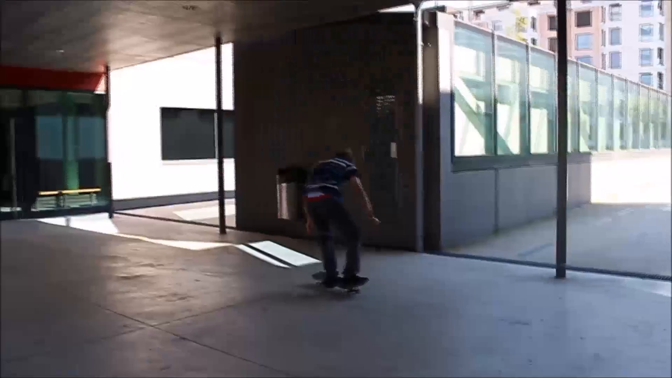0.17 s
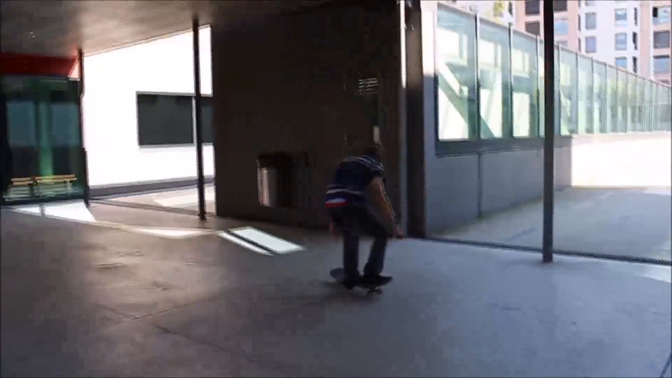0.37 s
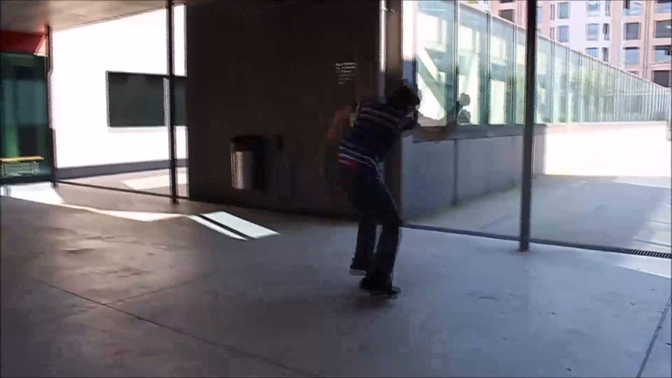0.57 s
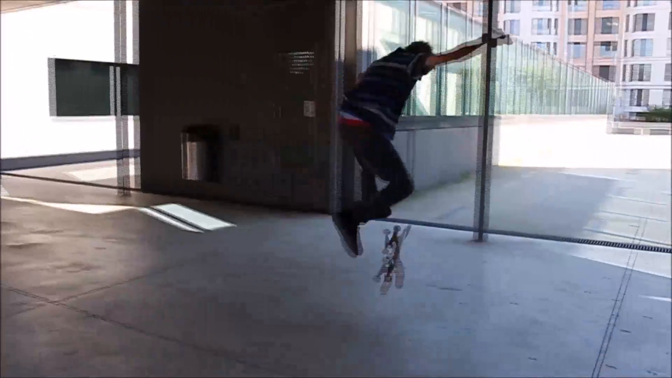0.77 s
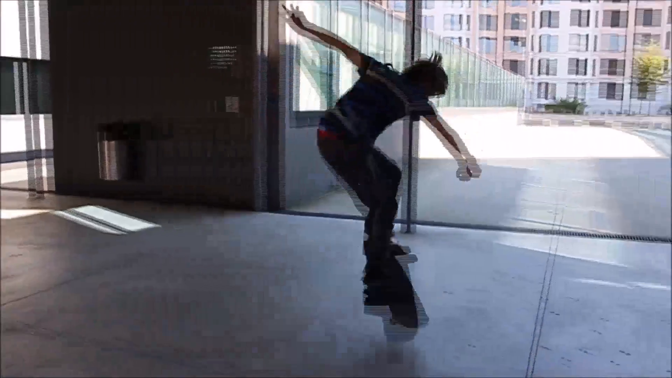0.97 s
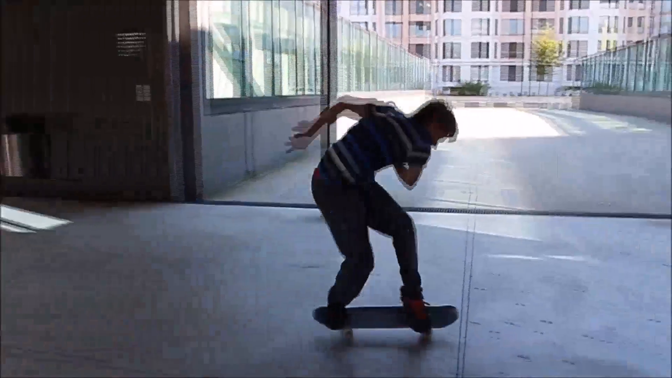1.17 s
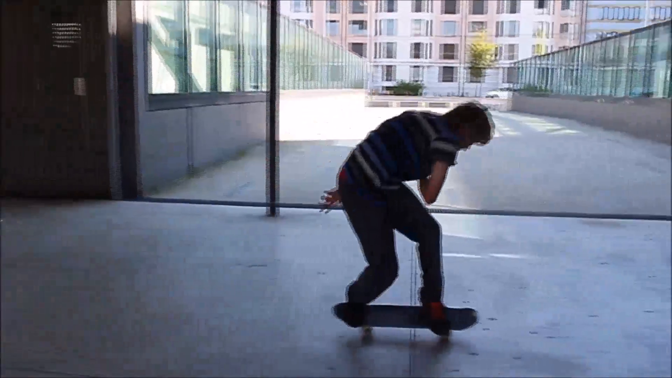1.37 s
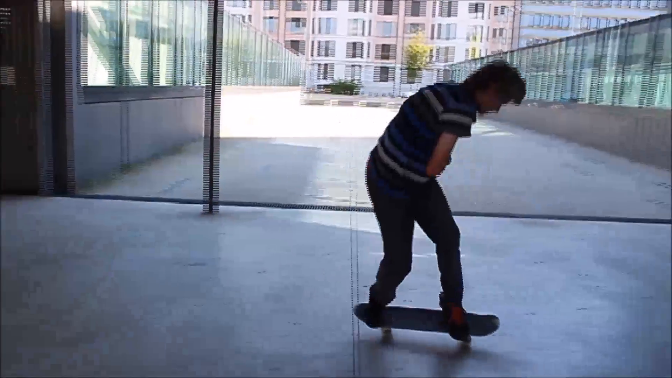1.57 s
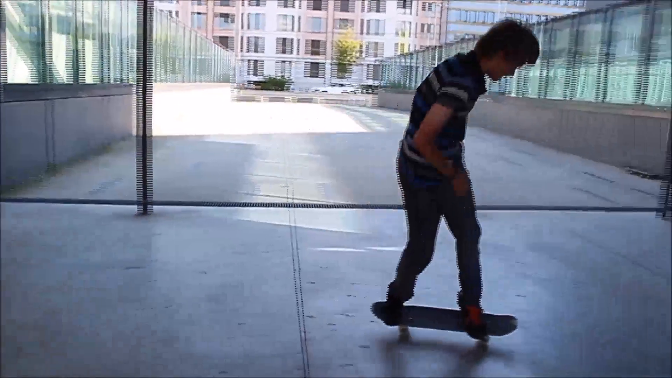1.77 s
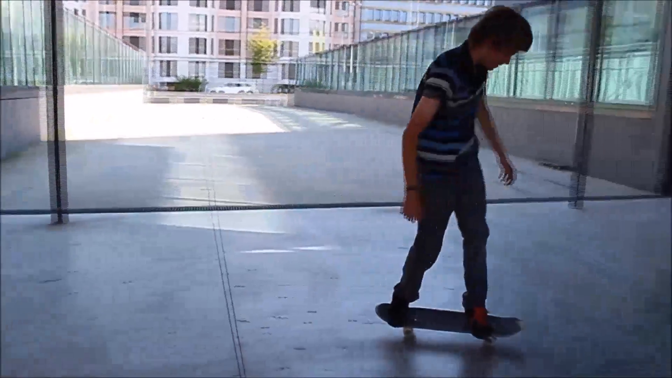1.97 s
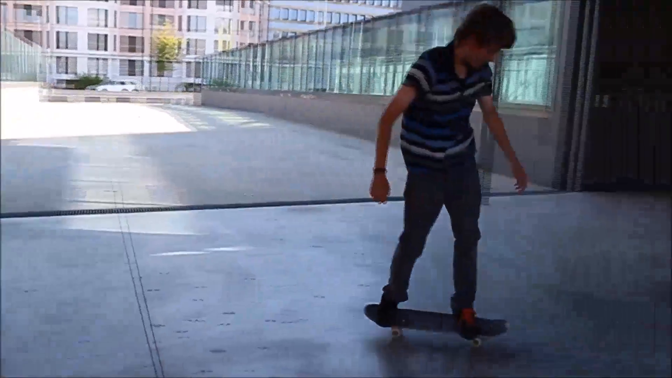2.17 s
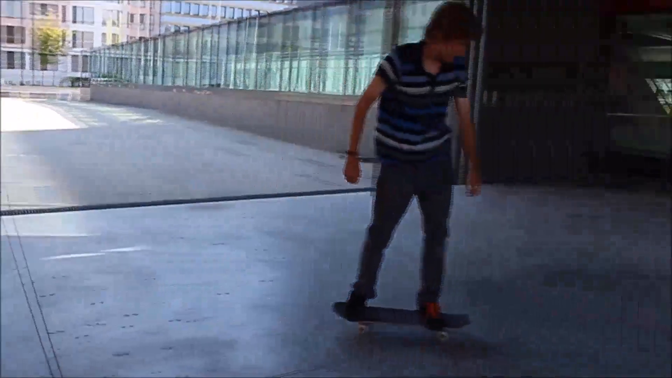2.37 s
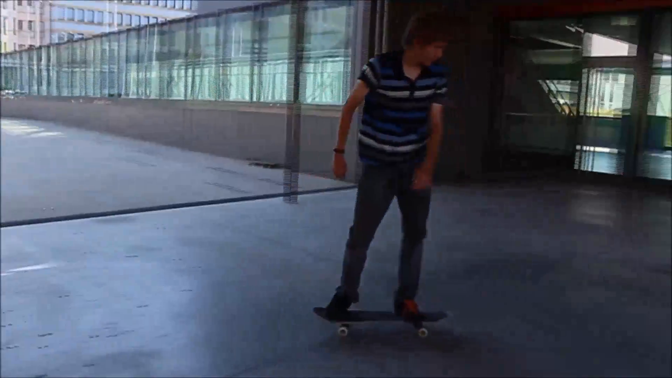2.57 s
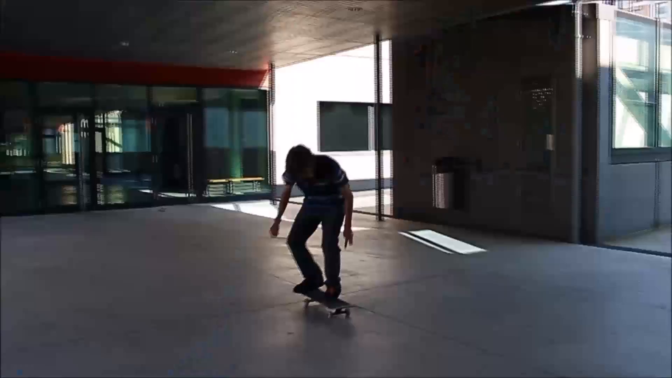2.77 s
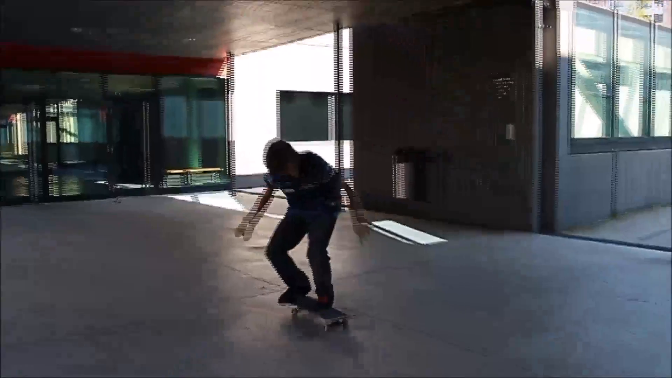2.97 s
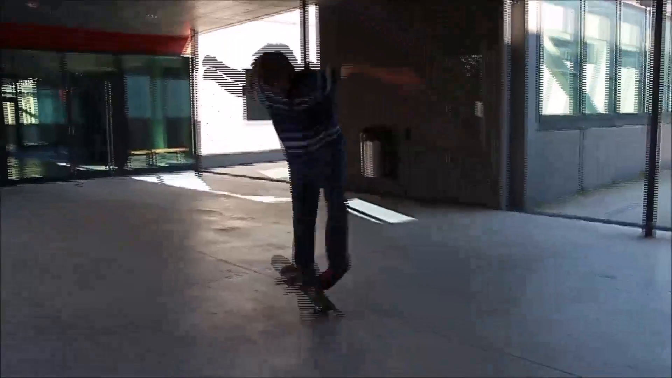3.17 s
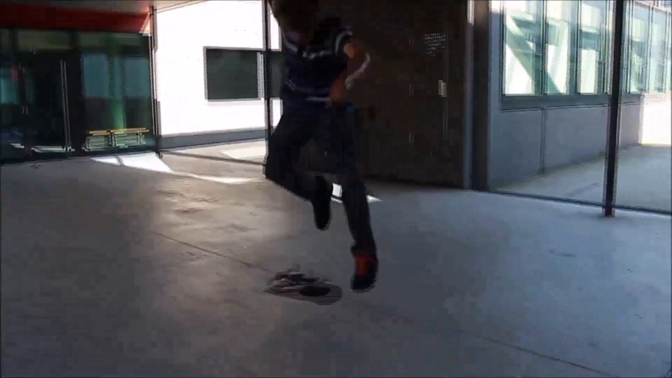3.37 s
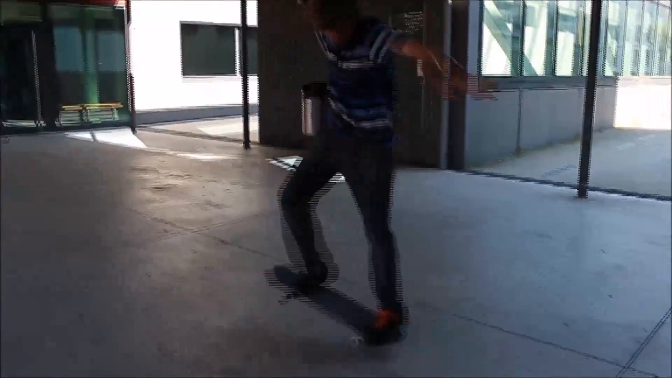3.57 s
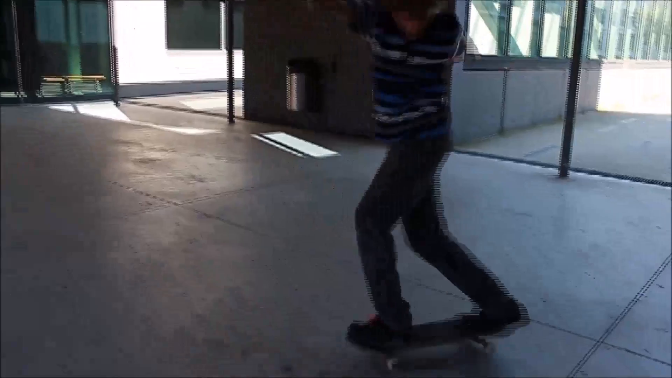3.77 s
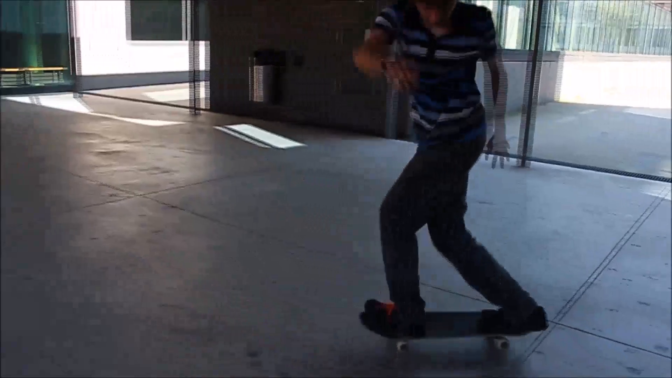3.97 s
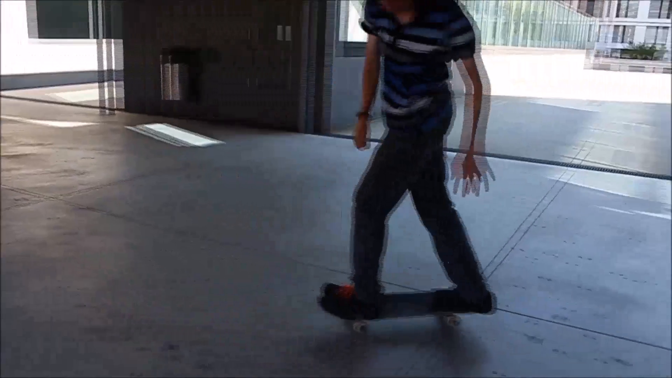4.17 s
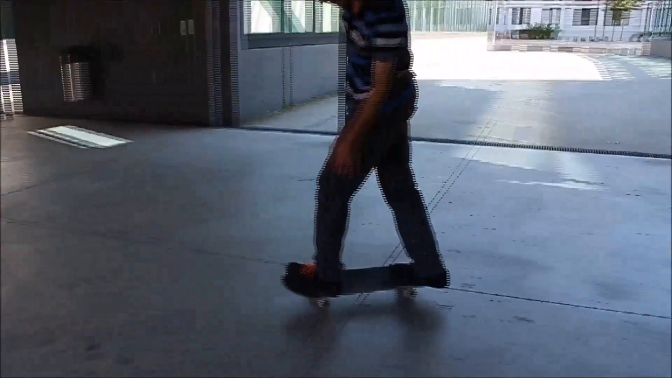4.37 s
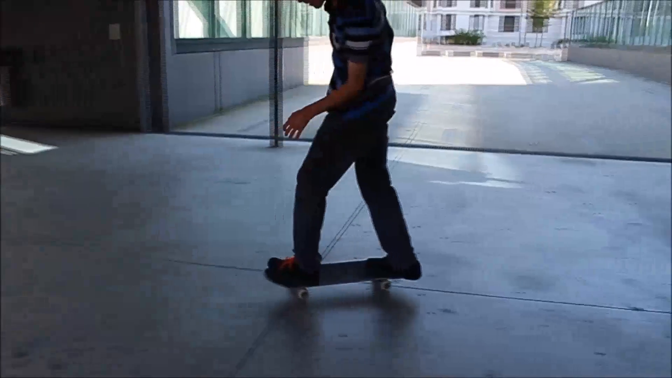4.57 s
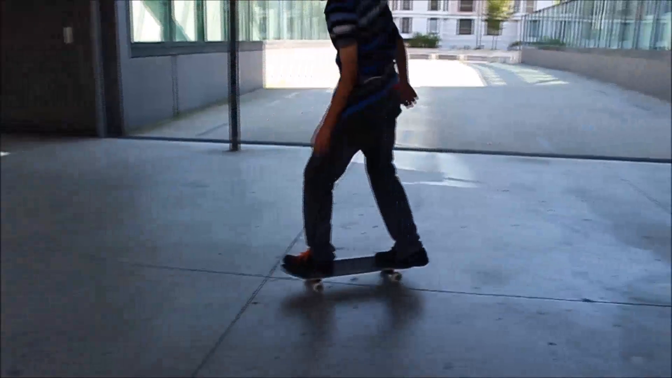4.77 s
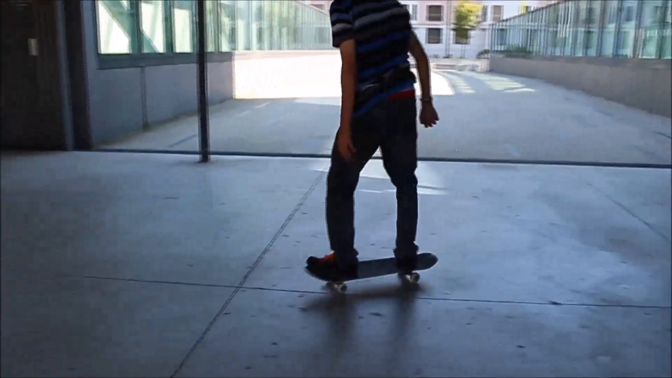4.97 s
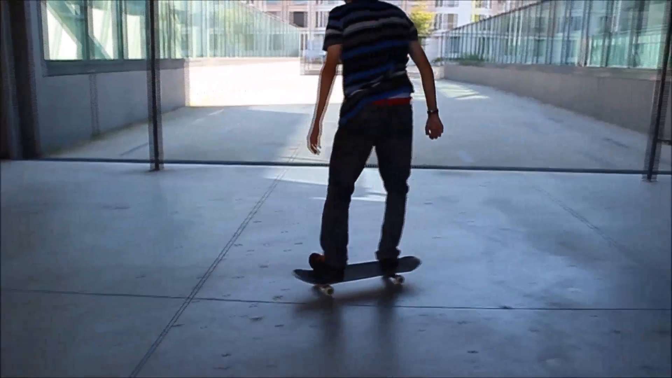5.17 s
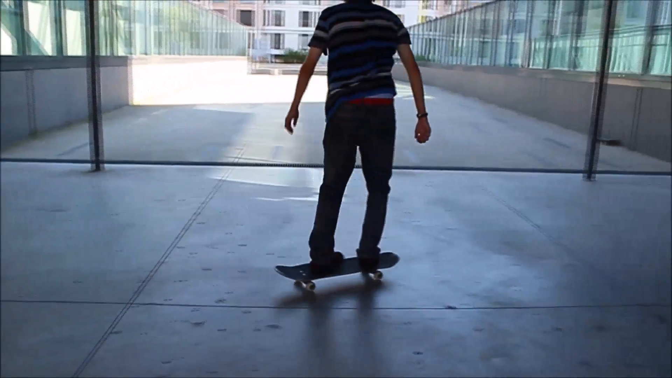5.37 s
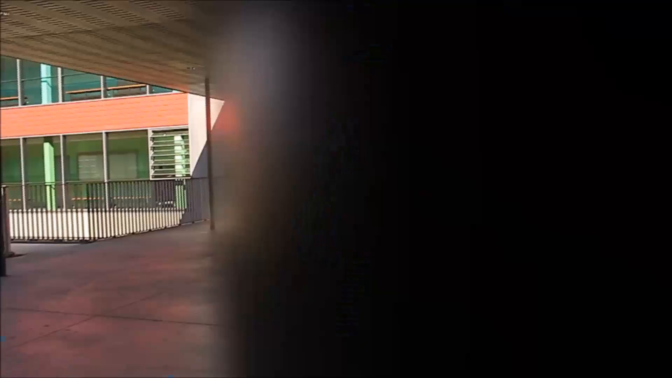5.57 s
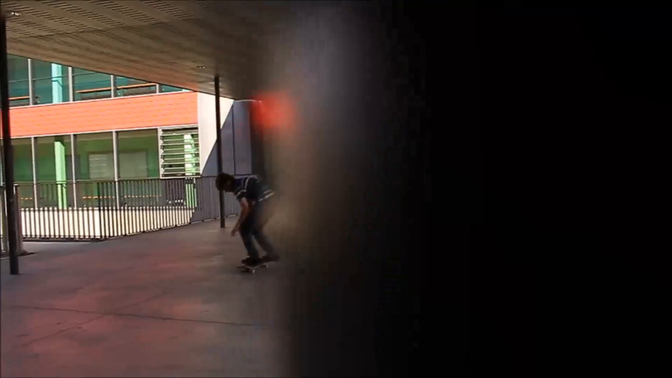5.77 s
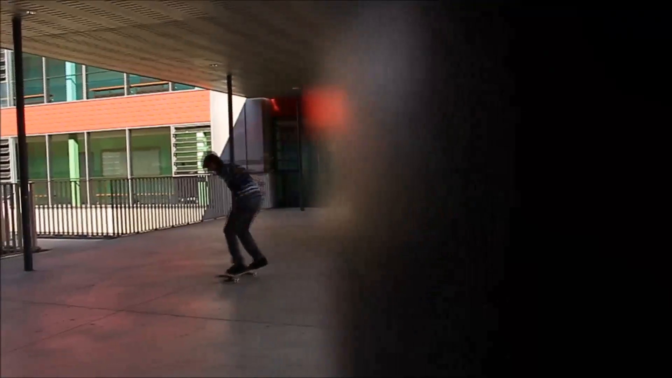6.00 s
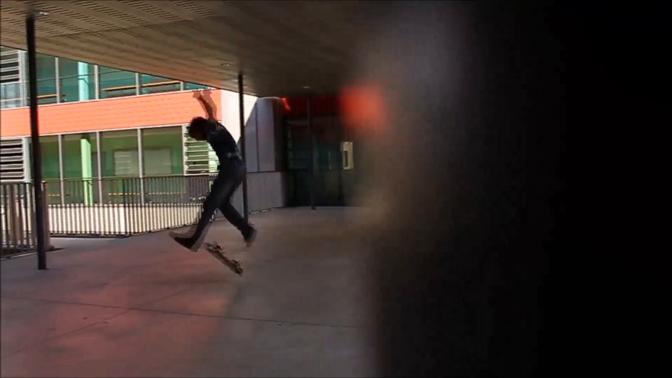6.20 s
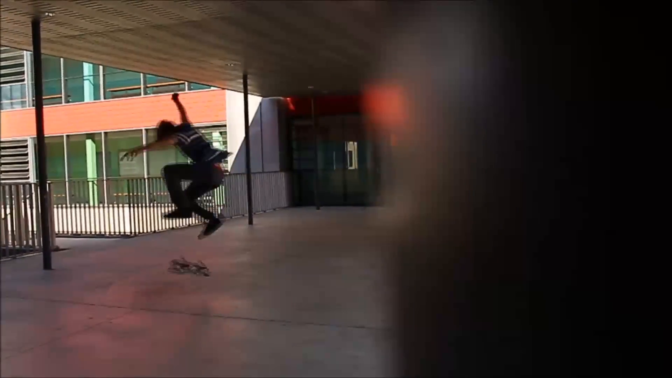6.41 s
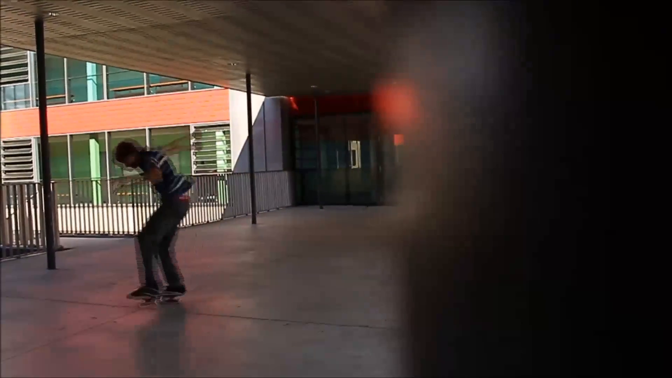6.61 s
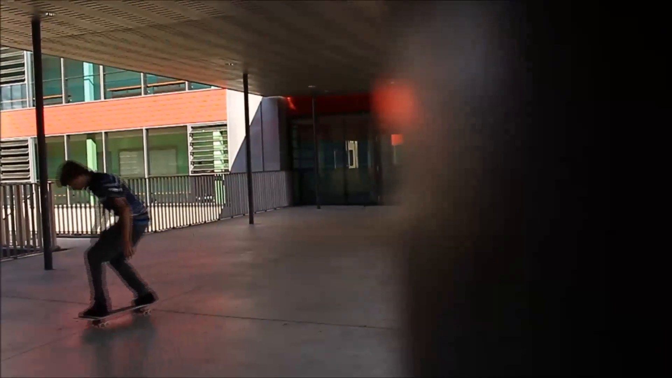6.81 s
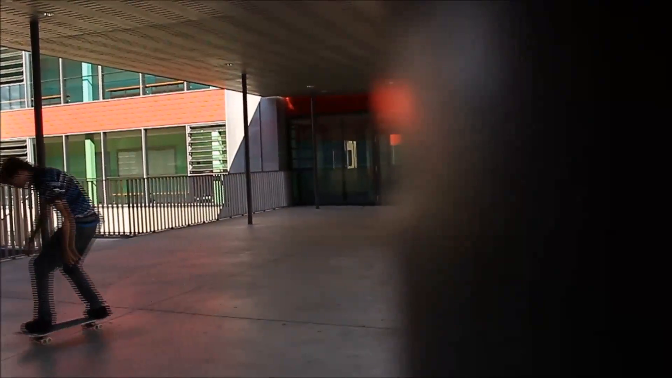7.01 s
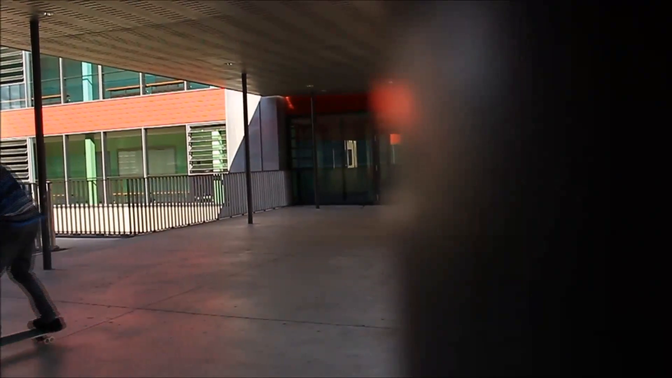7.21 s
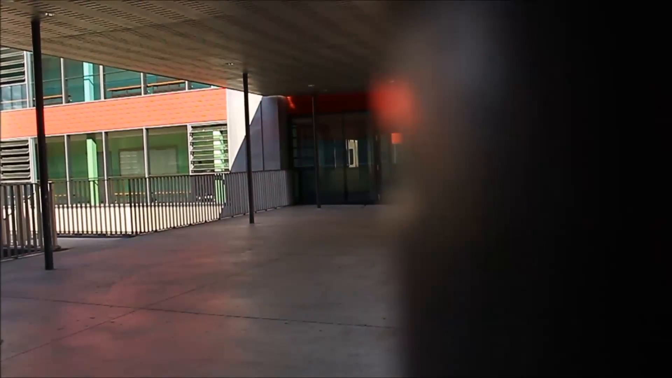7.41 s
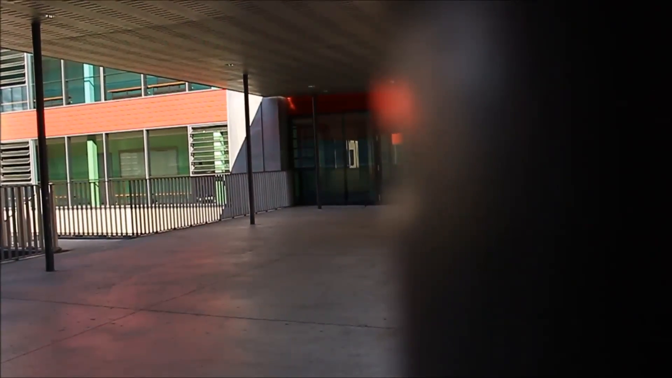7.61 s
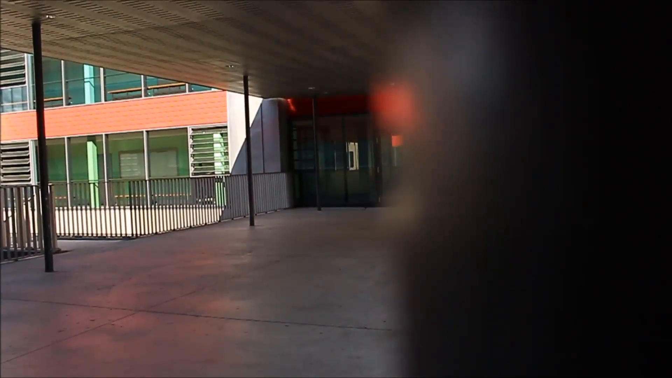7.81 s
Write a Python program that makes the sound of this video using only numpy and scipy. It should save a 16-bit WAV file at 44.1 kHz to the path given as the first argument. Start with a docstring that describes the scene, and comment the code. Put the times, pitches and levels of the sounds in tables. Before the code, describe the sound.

Wooden deck cracks and wheel rumble in an echoing concrete space with faint distant town noise. Three tricks follow one another, each a sharp pop, a near-silent flight and a burst of slaps and rattles. The second lands hardest, with rough skidding squeals. A tiny dip marks a change of viewpoint, where low draught rumble joins the microphone; the last landing is dull and heavy, then wheels roll away.

```python
"""Skateboard flip tricks under a plaza roof

A skateboarder does three flip tricks on smooth concrete: wheels roll in as coloured noise with grit,
and tail pops and landings are gritty bursts of force sent through the resonances of the deck.
Skidding wheels squeal as rough falling tones; shoes, swishes and metal ticks fill the gaps.
Roof and walls answer with a tail of diffuse noise, over distant town and a low draught.
The loudest blows overload the microphone."""
import sys
import numpy as np
from scipy import signal
from scipy.fft import rfft, irfft, next_fast_len
from scipy.io import wavfile
from scipy.ndimage import uniform_filter1d, map_coordinates

SR = 44100
rng = np.random.default_rng(int(sys.argv[2]) if len(sys.argv) > 2 else 0)


def int16_out(signal):
    """Quantize to a 16-bit WAV file."""
    q = np.round(np.clip(np.atleast_2d(signal).T, -1, 1) * 32767)
    wavfile.write(sys.argv[1], SR, q.astype(np.int16))


N = 346185
TIME = np.arange(N) / SR
TOP_HZ = 16000  # band limit

# flights of the board and how wet the blows of each trick are: take-off t/s, touch-down t/s, room level/dB
FLIGHTS = [(0.673, 1.165, -1.5), (3.322, 3.864, -3.5), (6.313, 6.729, -4.5)]
# bright crack of trucks and grip, before the deck modes: f/Hz, relative level/dB (per Hz)
CRACK_COLOUR = [(500, -46), (2400, -6.5), (4000, 5), (6500, -2.5), (9000, -3.5), (12000, -10),
                (16000, -14.5)]


def amp(db):
    """Decibels to gain."""
    return 10 ** (np.asarray(db) / 20)


def unit(x):
    """Scale to rms 1."""
    return x / np.sqrt(np.mean(x ** 2) + 1e-20)


def crest(x, size=176):
    """Scale so that the loudest few milliseconds have rms 1."""
    return x / np.sqrt(uniform_filter1d(x * x, size).max() + 1e-20)


def along(points, hz):
    """Read (Hz, value) points on a log frequency axis."""
    f, v = np.transpose(points)
    return np.interp(np.log(hz + 1), np.log(f + 1), v)


def curve(rows):
    """Read (s, value) points at every sample."""
    return np.interp(TIME, *np.transpose(rows))


def wobble(rate, size):
    """A smooth random curve with rate knots a second."""
    at = np.arange(size) * rate / SR
    return map_coordinates(rng.standard_normal(int(at[-1]) + 4), [at])


def add(track, s, x):
    """Mix x into the track from time s."""
    i = max(0, round(s * SR))
    track[i:i + len(x)] += x[:max(0, N - i)]


def noise(spectrum):
    """Noise of rms 1 with the given colour."""
    m = next_fast_len(N, True)
    white = rfft(rng.standard_normal(m))
    colour = amp(along(spectrum, np.fft.rfftfreq(m, 1 / SR)))
    return unit(irfft(white * colour, m)[:N])


def patchy(x, patchy_db):
    """Let the colour of a noise drift at random, as the slab changes under the wheels."""
    z = signal.stft(x, nperseg=1024)[2]
    field = uniform_filter1d(rng.standard_normal(z.shape), size=4, axis=0)  # smooth over frequency
    field = uniform_filter1d(field, size=8, axis=1)  # and over time
    return unit(signal.istft(z * amp(patchy_db * unit(field)), nperseg=1024)[1][:N])


def swells(rows):
    """A rounded rise and fall for each (s, length s, dB) row."""
    out = np.zeros(N)
    for s, length, db in rows:
        add(out, s, amp(db) * np.sqrt(np.hanning(int(length * SR)).clip(0)))
    return out


def shifted(spectrum, peak_hz):
    """Slide a spectrum along frequency so that it peaks at peak_hz."""
    top_hz = max(spectrum, key=lambda point: point[1])[0]
    return [(hz * peak_hz / top_hz, db) for hz, db in spectrum]


def between(soft, hard, hardness):
    """A property of a contact, from soft to hard and a little beyond."""
    return soft + (hard - soft) * np.clip(hardness, 0, 1.2)


def board(spectrum, size=16384):
    """Causal response of the deck: a broad colour with its modes standing out."""
    # modes of the maple deck with its trucks: f/Hz, width/Hz, mode level over the broad colour/dB
    deck = [(289, 24.6, 7), (472, 64, 1.5), (572.6, 13, 5), (648, 7, 1), (708, 19, 6), (770, 20, 3.5),
            (1080, 51, 2), (1264, 190, 1.5), (1525, 13, 3.5), (1635, 29, 4), (1750, 55, 1.5), (2348, 19, 4),
            (2560, 23, -1), (3115, 48, -12), (4630, 83, -3)]
    hz = np.fft.rfftfreq(size, 1 / SR)
    power = 1 + sum(amp(db) ** 2 / (1 + (2 * (hz - centre) / width) ** 2) for centre, width, db in deck)
    magnitude = amp(along(spectrum, hz)) * np.sqrt(power)
    # folding the cepstrum gives minimum phase: the energy comes as early as it can
    cepstrum = irfft(np.log(magnitude + 1e-6))
    cepstrum[1:size // 2] *= 2
    cepstrum[size // 2 + 1:] = 0
    return np.exp(rfft(cepstrum))


def strike(response, t60, snap, grit, size=16384):
    """A first contact and a dying, gritty rattle of the hardware, sent through the board."""
    t = np.arange(size) / SR
    force = rng.standard_normal(size) * np.exp(grit * rng.standard_normal(size))
    force *= amp(-60 * t / max(t60, .005))
    force[0] += snap
    return crest(irfft(rfft(force) * response))


def air(city_db=-56, gust_db=3):
    """Distant town noise, and a draught that rumbles on the microphone."""
    # town colour: f/Hz, relative level/dB (per Hz)
    town = [(15, -47), (25, 0.5), (120, -3.5), (175, -6), (206, -6), (863, -1), (1890, -10), (2690, -11),
            (4140, -15), (5730, -22.5), (16000, -28)]
    # rumble colour: f/Hz, relative level/dB (per Hz)
    rumble = [(20, -31), (60, -5), (115, -3.5), (190, -4.5), (400, -10.5), (1500, -70)]
    # strength of the draught, around which it gusts: t/s, level/dB
    draught = [(0, -85), (5.64, -85.5), (5.7, -47.5), (6.1, -51.5), (6.45, -46.5), (7.1, -45.5),
               (7.45, -51.5), (7.85, -66)]
    gusts = amp(curve(draught) + gust_db * wobble(11, N))
    return amp(city_db) * noise(town) + noise(rumble) * gusts


def rolling(uneven_db=1.04, grain_db=0.5):
    """Wheels drum on the slab's fine roughness and on specks of grit, quieter while the board flies."""
    # rolling colour, for the grit before the deck modes: f/Hz, relative level/dB (per Hz)
    wheels = [(71, -32), (120, -9.5), (179, -8), (266, -5.5), (493, 0.5), (735, -4.5), (915, -5),
              (1010, -5), (1600, -7.5), (2480, -22), (4320, -31), (5280, -39), (6190, -33), (8340, -42.5),
              (14000, -45)]
    # rolling strength before the flight dips and unevenness: t/s, level/dB
    strength = [(0, -40), (.18, -47), (.3, -38.5), (.64, -46.5), (1.2, -38), (1.75, -40.5), (2.4, -48),
                (2.82, -50.5), (2.87, -45), (3.28, -40.5), (3.9, -48.5), (5.05, -52.5), (5.4, -59.5),
                (5.64, -54.5), (5.68, -44), (6.8, -35), (7.3, -48.5), (7.55, -40), (7.85, -42)]
    flight_db, lift_s = -13.5, 0.052  # in the air the wheels only spin; time to unload or load them
    grit_per_s, grit_db, grit_spread_db = 70, -10.5, 2
    airborne = sum(np.clip(np.minimum(TIME - up, down - TIME) / lift_s + .5, 0, 1)
                   for up, down, _ in FLIGHTS)
    specks = (rng.random(N) < grit_per_s / SR) * amp(grit_spread_db * rng.standard_normal(N))
    grit = unit(signal.fftconvolve(specks, irfft(board(wheels)))[:N])
    level_db = curve(strength) + flight_db * airborne
    level_db += uneven_db * wobble(37, N) + grain_db * wobble(170, N)
    return (patchy(noise(wheels), patchy_db=1.8) + amp(grit_db) * grit) * amp(level_db)


def bumps(body_db=-4, hiss_db=-26.5, t60=0.15, rise=0.0073):
    """Soft knocks, without a sharp snap, as the wheels cross joints or touch down again in a turn."""
    # wheels bumping over the slab: t/s, relative level/dB, peak f/Hz of the knock before the deck modes
    bump_rows = [(0.204, -26, 700), (0.286, -28, 720), (0.437, -22, 615), (0.469, -26.5, 580),
                 (1.487, -20.5, 721), (1.635, -20.5, 805), (1.830, -25.5, 660), (2.002, -21.5, 630),
                 (2.859, -26, 374), (5.705, -26, 447), (5.917, -26.5, 543), (7.543, -31, 650),
                 (7.657, -29.5, 403), (7.823, -27, 517)]
    # knock colour, slid to each peak: f/Hz, relative level/dB (per Hz)
    knock_colour = [(80, -26), (260, -7), (520, 0), (750, -4.5), (1050, -1), (1600, -6.5), (2400, -22),
                    (6000, -54)]
    out = np.zeros(N)
    crack = board(CRACK_COLOUR)
    for s, db, hz in bump_rows:
        knock = amp(body_db) * strike(board(shifted(knock_colour, hz)), t60, snap=0, grit=0.44)
        knock += amp(hiss_db) * strike(crack, t60, snap=0, grit=1.0)
        onset = 1 - np.exp(-np.arange(len(knock)) / SR / rise)
        add(out, s, amp(db) * knock * onset)
    return out


def plaza(build=0.011, size=57344):
    """Returns a function that gives roof and wall echoes: a diffuse tail, drawn anew at every call."""
    # decay: f/Hz, t60/s
    decay = [(100, 1.08), (500, 0.94), (1200, 1.01), (2300, 0.95), (4500, 0.96), (9000, 0.59),
             (15000, 0.28)]
    # strength of the echoes: f/Hz, level/dB
    answer = [(100, 0.5), (500, -0.5), (1500, 0), (2350, 1.5), (2900, -1), (5000, 0), (12000, 2.5)]
    hz, t, _ = signal.stft(np.zeros(size), SR, nperseg=256)
    fade = amp(along(answer, hz)[:, None] - 60 * t / along(decay, hz)[:, None])
    fade = fade * (1 - np.exp(-(t / build) ** 2))  # echoes take a moment to build up
    # level set by the energy of the band at 1 kHz
    norm = np.sqrt(2 / np.sum(fade[np.searchsorted(hz, 1000)] ** 2)) / 128

    def echoes(x):
        """Convolve with a tail of random phases."""
        tail = signal.istft(fade * np.exp(2j * np.pi * rng.random(fade.shape)), nperseg=256)[1]
        return signal.fftconvolve(x, tail * norm / np.sqrt(2))
    return echoes


def ticks(t60=0.016):
    """Loose washers and bearings click: very short strikes in a narrow band."""
    # small metal ticks of the trucks: t/s, level/dB, peak f/Hz before the deck modes
    tick_rows = [(0.205, -39, 3800), (0.648, -27, 2050), (1.236, -24, 3650), (1.848, -44, 7550),
                 (2.559, -41, 3100), (3.300, -29.5, 9000), (3.423, -47.5, 9700), (5.527, -52.5, 7000),
                 (6.207, -48, 6800), (6.299, -16, 2650), (6.853, -22, 8700)]
    out = np.zeros(N)
    for s, db, hz in tick_rows:
        colour = [(hz / 8, -36), (hz * .6, -10), (hz, 0), (hz * 1.15, -7), (hz * 2, -20), (hz * 4, -38)]
        add(out, s, amp(db) * strike(board(colour), t60, snap=7.5, grit=.5))
    return out


def scrapes(grain_db=3):
    """A sole shifts on the sandy grip tape in a short, grainy swell."""
    # shoes dragging over the grip tape: t/s, length/s, level/dB
    drags = [(0.27, 0.041, -74.5), (3.185, 0.063, -48.5), (3.253, 0.055, -48), (6.16, 0.084, -53)]
    # sandy hiss: f/Hz, relative level/dB (per Hz)
    sand = [(600, -20), (2000, 22.5), (3500, 12), (6500, 7.5), (10000, -2), (16000, -2)]
    return swells(drags) * noise(sand) * amp(grain_db * wobble(500, N))


def contacts():
    """Every blow, and the softer rebound as the deck comes down once more."""
    # tail pops, catches and landings:
    # t/s, relative level/dB, hardness of the contact (0-1), thud level over the clack/dB
    hits = [ (0.642, -23.5, 0.6, -14), (0.649, -17, 0.38, -7.5), (0.693, -27, 0.9, -15),
            (0.758, -23, 0.53, -7), (0.770, -20.5, 0.52, -7), (1.1217, -32, .3, 4),
            (1.1273, -13, 0.44, 5.5), (1.1351, -9.5, 0.6, -2.5), (1.1596, -7.5, 0.14, -12.5),
            (1.236, -13, 0.6, -6), (1.2432, -10.5, 0.7, -7.5), (1.2515, -4, 0.36, -7),
            (1.2621, -11, 0.03, -7), (1.303, -12.5, 0.2, -12), (3.286, -17.5, .6, -3.5),
            (3.2995, -13, 1, -15), (3.6025, -16.5, 0.66, -2), (3.636, -7, 0.92, 1),
            (3.6465, -4.5, 0.68, 4.5), (3.6583, -9, 0.4, 8.5), (3.6832, -13.5, 0.8, -2),
            (3.716, -10.5, 0, -1.5), (3.744, -14, 0, -0.5), (3.848, -13, 0.7, -2.5), (3.855, 1, 0.89, -5.5),
            (3.8657, -3.5, 0.75, -2), (3.8818, -3, 0.85, -12), (6.299, -12, .6, -9), (6.320, -19, .4, -2.5),
            (6.455, -29, 0.2, -16), (6.705, -36, .3, 8), (6.7137, -2.5, 0.4, -9), (6.7203, -3.5, 0.2, -3.5),
            (6.7371, -5, 0.1, 2.5), (6.7595, -5, .6, -3), (6.7776, -10.5, 0.7, 2.5),
            (6.862, -11.5, 0.1, 0.5)]
    rebound_s, scatter = 0.045, 0.25  # median delay and its log spread
    rebound_db, softening = -14, 0.45  # weaker, and with this share of the hardness
    delays = rebound_s * np.exp(scatter * rng.standard_normal(len(hits)))
    rebounds = [(s + delay, db + rebound_db, hardness * softening, weight_db)
                for (s, db, hardness, weight_db), delay in zip(hits, delays)]
    return list(hits) + rebounds


def blows(echoes, clack_db=-4, thud_db=-4, crack_db=-4):
    """Tail pops and landings: the deck thuds and clacks, trucks and grip crack."""
    # deep voice of the deck, slid to each thud: f/Hz, relative level/dB (per Hz)
    thud_colour = [(25, -41), (90, -43), (200, -20), (360, -12), (520, -3.5), (800, -7.5), (1100, -10),
                   (2000, -29), (5000, -62)]
    # middle voice of the deck, slid to each clack: f/Hz, relative level/dB (per Hz)
    clack_colour = [(100, -40), (450, -20.5), (900, -1), (1650, -0.5), (2450, -6.5), (3200, -13.5),
                    (4800, -22.5), (9000, -47)]
    # a harder contact clacks higher, cracks more and rattles for less long
    soft_hz, hard_hz = 1437, 2045
    soft_crack_db, hard_crack_db = -26.5, -8.5
    soft_t60, hard_t60 = 0.15, 0.064
    full_thud_hz, octaves_per_db = 615, 0.03  # thud peak at 0 dB; weaker blows are deeper
    out = np.zeros(N)
    crack = board(CRACK_COLOUR)
    for s, db, hardness, weight_db in contacts():
        t60 = between(soft_t60, hard_t60, hardness)
        clack = board(shifted(clack_colour, between(soft_hz, hard_hz, hardness)))
        thud = board(shifted(thud_colour, full_thud_hz * 2 ** (octaves_per_db * db)))
        sharp_db = crack_db + between(soft_crack_db, hard_crack_db, hardness)
        hit = amp(clack_db) * strike(clack, t60, snap=15.7, grit=0.62)
        hit += amp(thud_db + weight_db) * strike(thud, 1.08 * t60, snap=9.5, grit=0.24)
        hit += amp(sharp_db) * strike(crack, 0.65 * t60, snap=5.5, grit=0.72)
        # wetness of the trick with the nearest take-off
        _, _, room_db = min(FLIGHTS, key=lambda flight: abs(flight[0] - s))
        add(out, s, amp(db) * hit)
        add(out, s, amp(db + room_db) * echoes(hit))
    return out


def stomps(t60=0.094):
    """Soft soles load the deck with one dull push."""
    # the rider's weight landing on the deck: t/s, level/dB
    landings = [(1.135, -34), (3.645, -34), (3.689, -32), (3.857, -31), (6.726, -31), (6.765, -19)]
    out = np.zeros(N)
    sole = board([(20, -30.0), (70, -24), (120, -12.5), (185, 5.5), (260, -4.5), (600, -32.5), (3000, -71.0)])
    for s, db in landings:
        add(out, s, amp(db) * strike(sole, t60, snap=13.0, grit=0.347))
    return out


def squeals(jitter=0.025, flutter_db=2.0, slope_db=12, edge=0.0092, bright_hz=2600,
            scrape_db=-14, scrape_grows=0.28):
    """Urethane sticks and slips on concrete: a rough, falling tone with overtones, and a hiss."""
    # skidding wheels: t/s, length/s, starting pitch f/Hz, sag as a share of the pitch,
    # level/dB of the tone, f/Hz around which overtones are strongest
    skids = [(1.242, 0.044, 786, .03, -18, 1810), (2.856, 0.11, 400.4, 0.012, -44, 350),
             (3.892, 0.051, 594, .022, -8.5, 1036), (3.918, 0.047, 1218, 0.055, -15, 2300),
             (3.941, 0.0534, 549.7, 0.118, -14.5, 1462), (3.944, 0.046, 1289, .1, -22, 2480),
             (4.265, 0.059, 1180, 0.0075, -39, 1133)]
    # hiss of a skid: f/Hz, relative level/dB (per Hz)
    skid_colour = [(100, -20), (600, 3), (3000, 3), (5000, 4), (7300, -4), (10000, 2), (12500, -5),
                   (16000, -11)]
    out = np.zeros(N)
    hiss = noise(skid_colour)
    for s, length, first_hz, sag, db, ring_hz in skids:
        n = int(length * SR)
        t = np.arange(n) / SR
        pitch = first_hz * (1 - sag * t / length) * (1 + jitter * wobble(485, n))
        phase = 2 * np.pi * np.cumsum(pitch) / SR
        orders = np.arange(1, int(TOP_HZ / first_hz))[:, None]
        hz = orders * first_hz
        # overtones fall by slope_db an octave away from ring_hz, and steeply above bright_hz
        strength = amp(-slope_db * np.abs(np.log2(hz / ring_hz))) / np.sqrt(1 + (hz / bright_hz) ** 6)
        tone = unit(np.sum(strength * np.sin(orders * phase), axis=0))
        # louder squeals carry more hiss in proportion
        scrape = amp(scrape_db + scrape_grows * db) * hiss[round(s * SR):][:n]
        grip = np.clip(np.minimum(t, length - t) / edge, 0, 1) * amp(flutter_db * wobble(148, n))
        add(out, s, amp(db) * grip * (tone + scrape))
    return out


def swishes(grain_db=1.5):
    """Wheels slide softly sideways as the rider turns: rounded swells of noise."""
    # wheels sliding sideways in a turn: t/s, length/s, level/dB
    turns = [(4.68, 0.14, -54), (4.92, 0.21, -52), (5.12, 0.11, -59)]
    # colour of the slide: f/Hz, relative level/dB (per Hz)
    slide = [(200, -20), (700, 1), (1500, 3), (3000, -2), (5000, -11.5), (9000, -18), (16000, -28.5)]
    return swells(turns) * noise(slide) * amp(grain_db * wobble(120, N))


def scene():
    """Board, plaza and open air."""
    echoes = plaza()
    knocks = bumps() + stomps() + scrapes() + swishes()
    skid = squeals()
    clicks = ticks()
    near = blows(echoes) + knocks + skid + clicks + rolling()  # the blows bring their own echoes
    hall = echoes(amp(-2.5) * knocks + amp(-7.0) * skid + amp(-14) * clicks)[:N]
    return (near + hall + air())[None]


def record(dry, hush_db=-22, low_cut_hz=48, full_scale=0.95):
    """The level dips briefly; loud peaks flatten; deep bass fades and nothing passes the band limit."""
    # the brief dip: start t/s, end t/s
    hush = (5.649, 5.679)
    x = dry * np.where((TIME > hush[0]) & (TIME < hush[1]), amp(hush_db), 1)
    x = x / (1 + np.abs(x / full_scale) ** 10) ** (1 / 10)  # overload with a narrow knee
    m = next_fast_len(N + 4096, True)
    hz = np.fft.rfftfreq(m, 1 / SR)
    low_cut = 1j * hz / (low_cut_hz + 1j * hz)
    return irfft(rfft(x, m) * low_cut * (hz < TOP_HZ), m)[..., :N]


dry = scene()
out = record(dry)
int16_out(out)
```